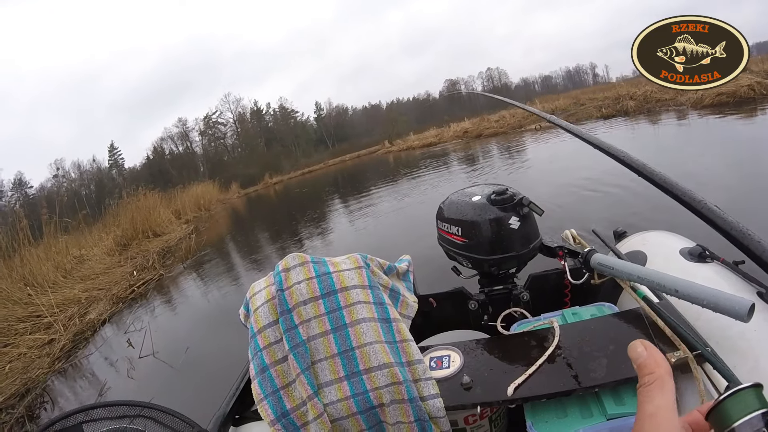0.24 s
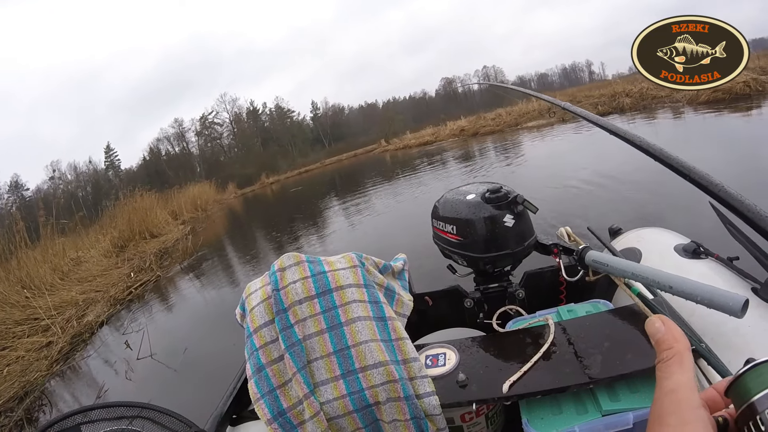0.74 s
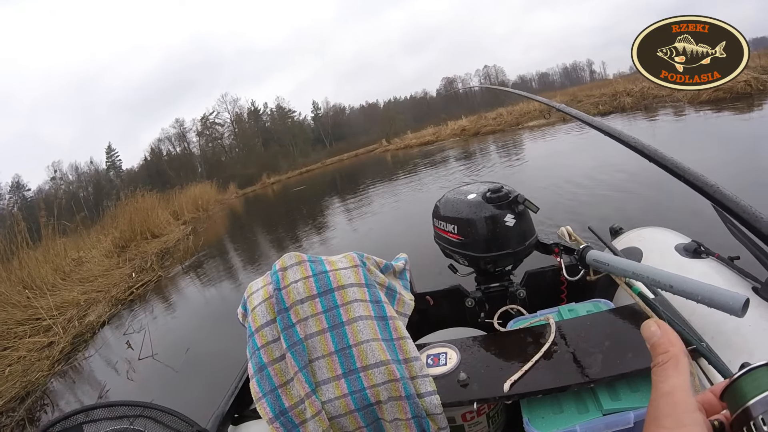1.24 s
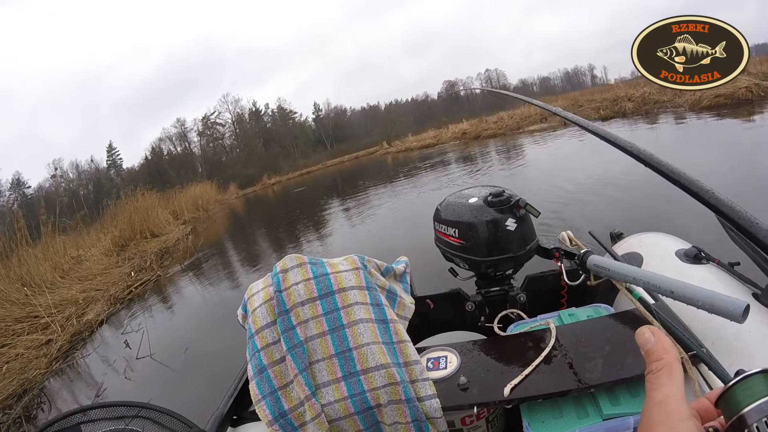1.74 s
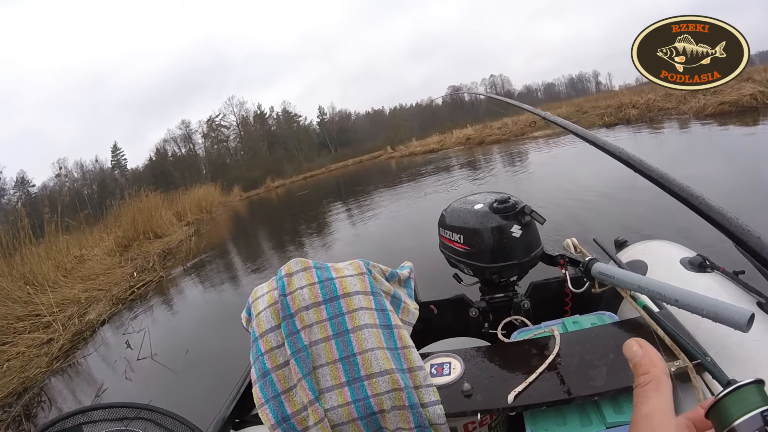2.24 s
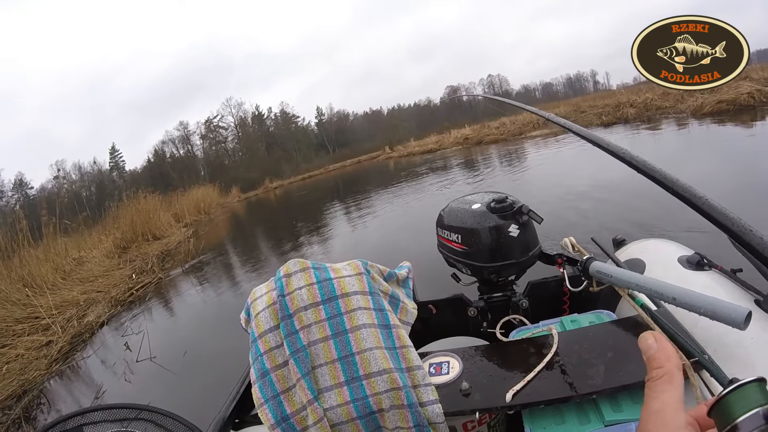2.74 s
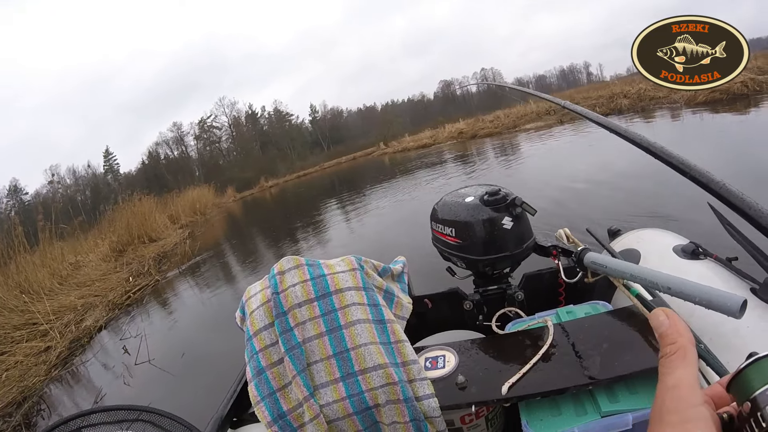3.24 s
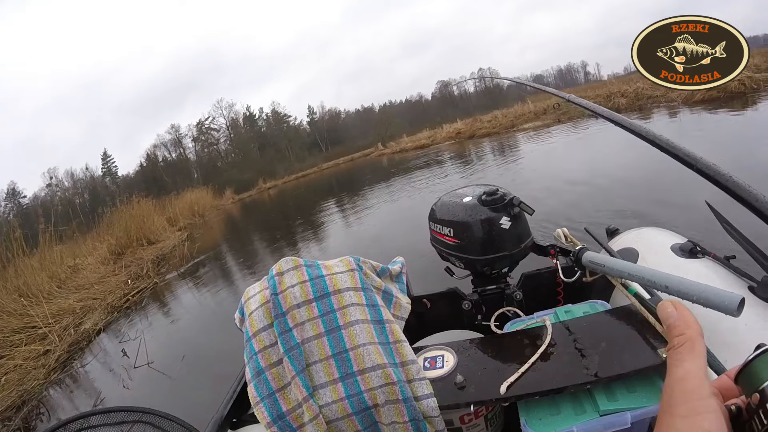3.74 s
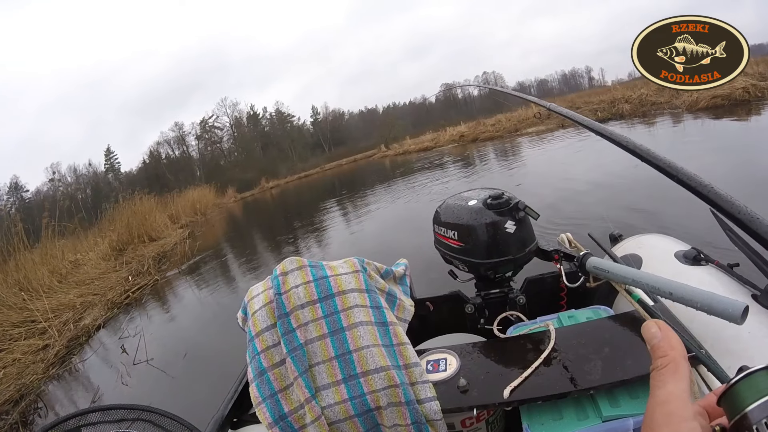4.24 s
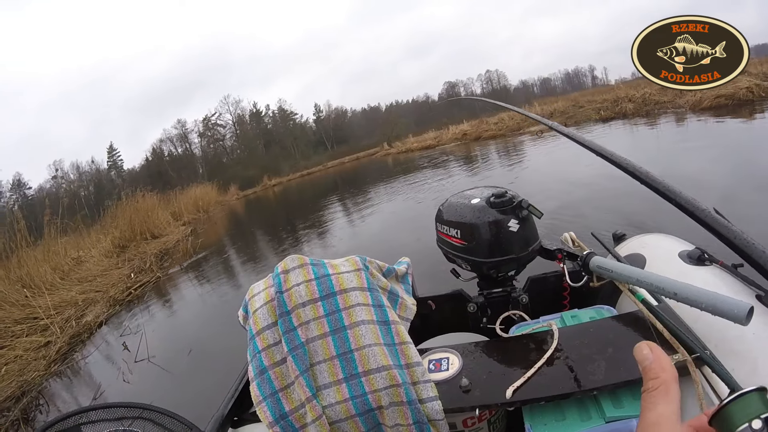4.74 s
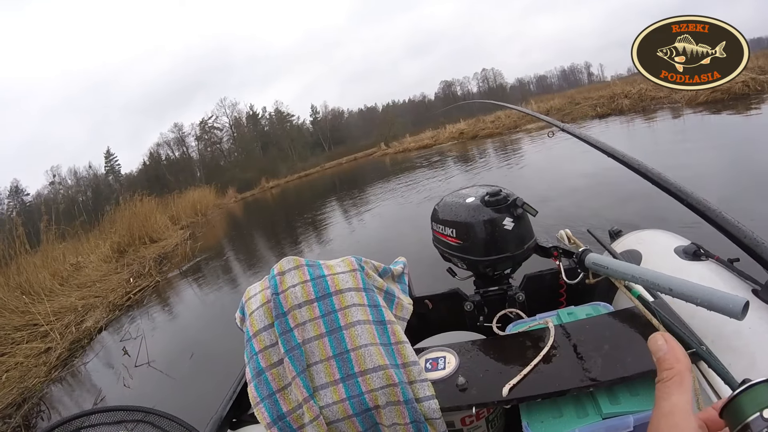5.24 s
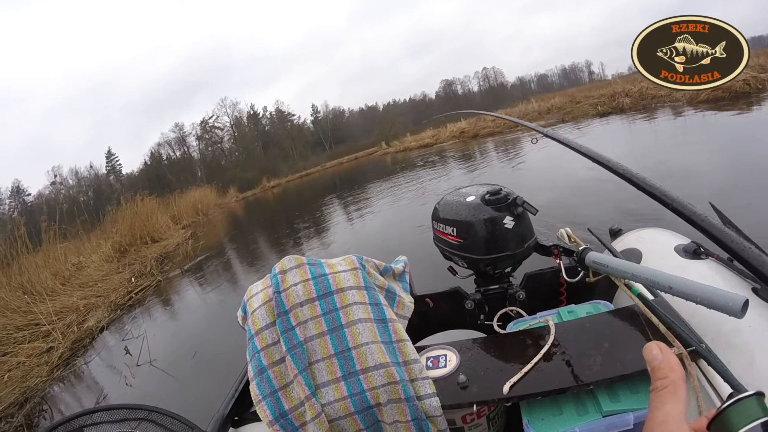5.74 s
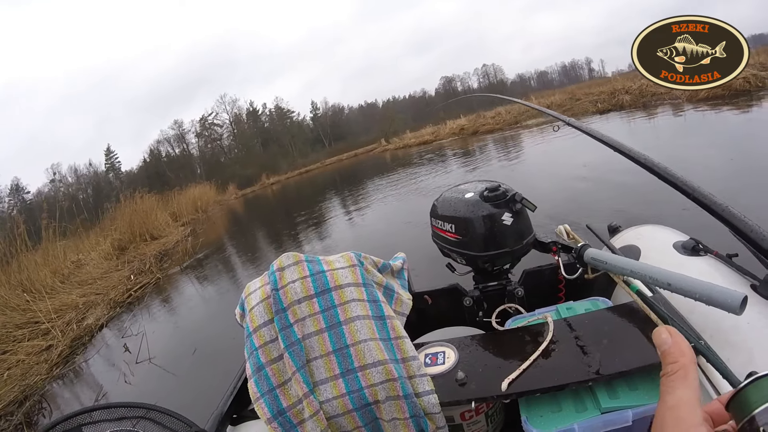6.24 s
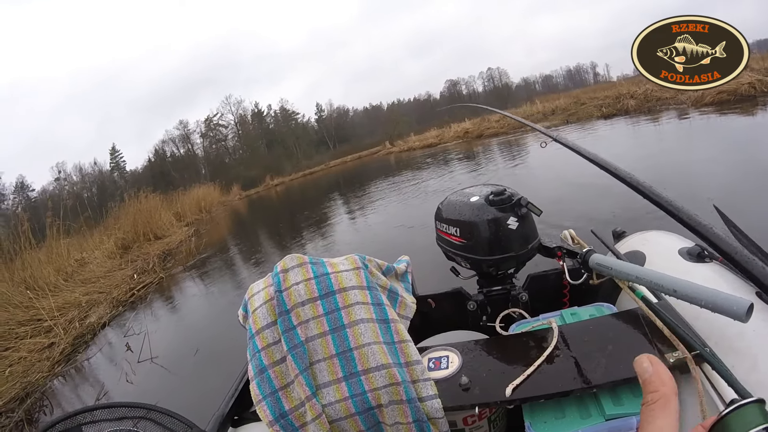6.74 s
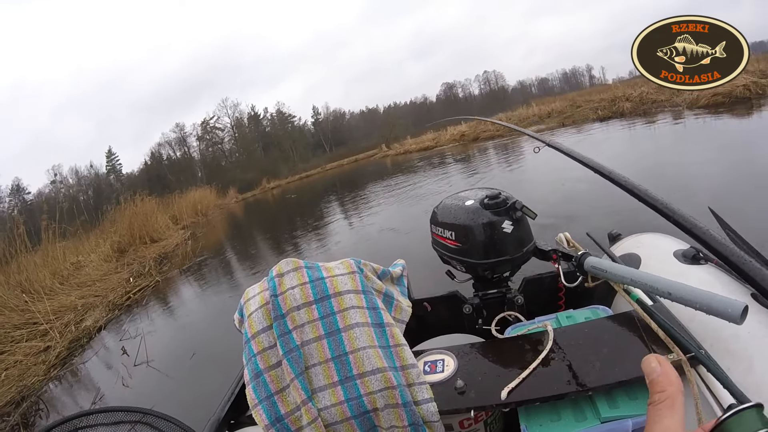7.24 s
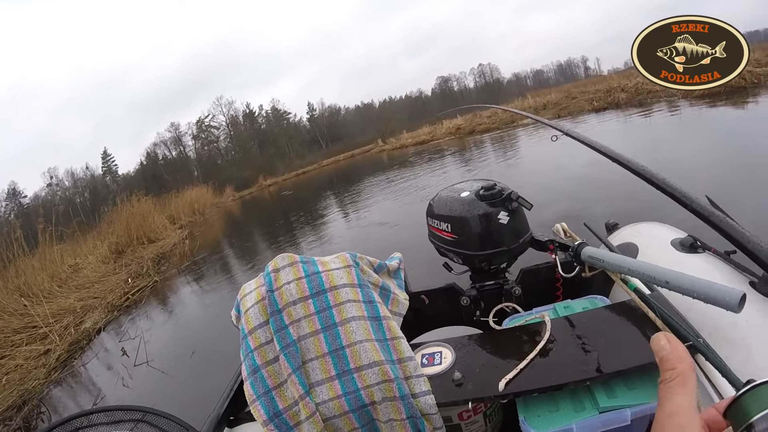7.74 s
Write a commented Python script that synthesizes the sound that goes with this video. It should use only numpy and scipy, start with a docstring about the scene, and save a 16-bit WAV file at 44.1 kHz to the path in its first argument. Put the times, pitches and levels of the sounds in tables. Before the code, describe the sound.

Close to the microphone, a fishing reel gives line in short, irregular runs: crisp metal clicks start slowly, speed into a bright buzz, then slow and stop. Taut line rubs and whines hollowly along the rod beneath them. Small dull knocks fall in the gaps. Outdoors on water, low wind buffets the microphone unevenly, stronger near the end, over faint hiss. Mono, dry, no echo.

```python
"""On a small boat, a fishing reel gives line in short runs: a spring pawl snaps over the teeth of the spool, slowly
at first, then as a buzz; every snap is an impact that rings the metal modes.
The braided line rubs and whines over the rod rings and so drives the resonances of the hollow rod.
Light wind buffets the microphone, as shaped noise of uneven strength, over a faint outdoor hiss and a thin tone."""
import sys
import numpy as np
from scipy import signal
from scipy.fft import rfft, irfft, next_fast_len
from scipy.io import wavfile
from scipy.ndimage import uniform_filter1d, map_coordinates

SR = 44100
rng = np.random.default_rng(int(sys.argv[2]) if len(sys.argv) > 2 else 0)


def rack_gain(trim_db):
    """Turn a fader trim in dB into the linear factor to multiply a signal by."""
    fader = np.asarray(trim_db, float)
    return 10 ** (fader / 20)


def to_wav(s):
    """Save 16-bit WAV."""
    ch = np.atleast_2d(s).T  # columns
    pcm = np.round(np.clip(ch, -1, 1) * 32767)  # PCM
    wavfile.write(sys.argv[1], SR, pcm.astype(np.int16))


N = 352359

# speed of the spool, one table per run: (time [s], speed [teeth/s])
SPOOL_SPEED = [
    [(0.1935, 13.5), (0.2175, 69.8), (0.2351, 133.7), (0.2619, 185.2), (0.2922, 167.8), (0.319, 121.5),
     (0.3366, 72.4)],
    [(2.0987, 21.2), (2.1135, 114.1), (2.129, 257.6), (2.1527, 376.6), (2.1795, 378.5), (2.2031, 166.8),
     (2.2187, 95.6)],
    [(2.7948, 24.8), (2.81, 106.7), (2.831, 177.0), (2.8599, 242.1), (2.8955, 221.1), (2.9359, 239.5),
     (2.9789, 406.5), (3.0219, 384.9), (3.0624, 291.1), (3.098, 199.8), (3.1269, 163.5), (3.1479, 107.3)],
    [(4.1719, 21.1), (4.1927, 74.6), (4.2125, 135.3), (4.2407, 135.7), (4.2604, 77.7)],
    [(4.661, 10.7), (4.6848, 73.0), (4.7044, 89.6), (4.7343, 112.7), (4.7642, 119.9), (4.7838, 74.7)],
    [(5.7772, -1.0), (5.8013, 84.0), (5.8236, 235.3), (5.8569, 308.0), (5.8966, 246.8), (5.9363, 192.3),
     (5.9697, 165.4), (5.992, 76.1)],
    [(6.6676, 28.7), (6.6839, 93.3), (6.7041, 142.8), (6.7342, 202.8), (6.77, 221.7), (6.8059, 185.8),
     (6.836, 95.5), (6.8561, 31.0)],
    [(7.3322, 64.7), (7.3436, 110.7), (7.3667, 164.3), (7.4018, 223.7), (7.4415, 220.3), (7.4766, 148.1),
     (7.4997, 88.8)],
]
# strength of each run: (snap level [dB], first tooth against the rest [dB], braid whine against the friction [dB])
RUN_LEVELS = [(-26, -4, -4.5), (-25.5, -6, -8.5), (-25, -4, -6.5), (-26.5, -2.5, -15), (-26, 0, -40),
              (-24.5, -2.5, -13), (-25, -1.5, -9), (-25, -0.5, -9.5)]
# lone faint ticks of the pawl spring: (time [s], level [dB])
SPRING_TICKS = [(3.1572, -36), (3.1794, -51), (4.9266, -59), (5.0978, -55)]
# resonances of pawl and spool: (frequency [Hz], bandwidth [Hz], level [dB])
METAL_MODES = [(1755, 206, -21), (2090, 162, -21), (2837, 372, -11.5), (3220, 422, -9), (4156, 344, -8.5),
               (4386, 190, -7.5), (4708, 148, -6), (4970, 270, -7), (6100, 540, -6.5), (6610, 256, -4),
               (7080, 283, -2), (8080, 420, -11), (8080, 436, -3), (8740, 320, -8.5), (9200, 4500, -8),
               (11540, 410, -8), (12500, 310, -7.5), (14220, 350, -6.5)]
# how the turning spool aims its sound: (frequency [Hz], swing either way [dB], weakest at [tooth])
SPOOL_AIM = [(5000, 1.5, 7), (6300, 4.5, 4.5), (7100, 3.5, 4.5), (7800, 3.5, 6.5), (8900, 3, 6.5),
             (12800, 3, 3.5)]
# resonances of the hollow rod and reel seat: (frequency [Hz], bandwidth [Hz], level [dB])
ROD_MODES = [(443, 480, -8.5), (614, 89, 4.5), (756.5, 75, 3), (984, 102, -1), (1136, 69, 1),
             (1760, 1750, -14), (2850, 400, -2)]
# strokes of the line over the rod rings: (start [s], length [s], level [dB], change over the stroke [dB])
LINE_STROKES = [(0, .06, -53, -11), (0.229, 0.12, -48, -4.5), (0.487, 0.01, -59, -16),
                (0.908, .012, -58, -11), (1.56, 0.33, -66.5, 0), (2.024, 0.053, -61, 11),
                (2.121, 0.17, -41.5, -19.5), (2.485, 0.22, -63, -1.5), (2.814, .13, -45, -15.5),
                (2.949, 0.21, -51.5, 2.5), (3.207, 0.027, -68.5, 9), (3.924, 0.07, -55.5, 0),
                (4.036, .015, -54.5, 0.5), (4.195, 0.055, -46, 2), (4.31, .012, -59, -3),
                (4.502, 0.065, -58.5, -1.5), (4.692, 0.088, -49, 3), (5.651, 0.11, -56.5, 3.5),
                (5.811, 0.043, -38.5, -11), (5.867, 0.12, -49.5, 1.5), (6.078, 0.023, -58.5, 0),
                (6.535, 0.075, -48.5, -7), (6.679, .18, -46.5, -3), (6.598, .06, -57.5, -4),
                (6.887, 0.22, -56.5, -12), (7.162, 0.067, -58.5, 4.5), (7.341, 0.18, -47.5, -4),
                (7.737, .12, -54.5, -4), (7.959, 0.011, -55.5, -9)]
# the line catching on a ring and knocking the rod: (time [s], level [dB])
LINE_CATCHES = [(0.483, -40), (0.901, -45), (2.46, -36.5), (3.917, -38), (4.306, -31.5), (5.642, -46),
                (5.687, -30), (6.055, -39), (6.493, -36), (6.539, -53), (7.715, -36)]
# slow course of the wind at the microphone: (time [s], level [dB])
WIND_STRENGTH = [(0.0, -37), (0.06, -45.5), (1.11, -46), (1.82, -41.5), (2.31, -48), (2.69, -41),
                 (2.76, -47), (4.56, -47.5), (4.65, -42.5), (4.83, -45.5), (5.85, -44.5), (5.94, -39.5),
                 (6.63, -37.5), (6.96, -32.5), (7.32, -44.5), (7.39, -39.5), (7.92, -37.5), (7.99, -55)]
# sudden changes of the wind on top: (time [s], half-length [s], rise [dB])
WIND_GUSTS = [(0.32, 0.016, -5), (1.291, 0.014, 9), (1.545, 0.038, 2.5), (2.708, 0.048, 8),
              (2.992, 0.063, 3), (4.41, 0.077, 8.5), (4.742, .07, 2.5), (5.086, .08, 2), (5.5, 0.12, 2.5),
              (5.943, 0.047, 5), (6.306, 0.042, 8), (7.03, 0.041, -1), (7.41, 0.063, 5),
              (7.547, 0.046, 9.5), (7.79, 0.056, 2)]
# noise spectrum of the buffeting: (frequency [Hz], density [dB])
BUFFET_COLOUR = [(8.8, -20), (15, 6), (29, -5), (62, -11.5), (95, -12), (140, -30), (180, -30.5),
                 (310, -120)]
# noise spectrum of the lighter flutter: (frequency [Hz], density [dB])
FLUTTER_COLOUR = [(74, -48), (125, 0.5), (209, -4), (290, -3.5), (355, -9), (500, -14), (650, -16.5),
                  (1100, -120)]
# noise spectrum of the outdoor hiss: (frequency [Hz], density [dB])
HISS_COLOUR = [(240, -29), (400, -3.5), (569, -8.5), (683, -4.5), (1050, -14.5), (1300, -12.5), (6280, -22),
               (8800, -28.5), (9950, -30), (13300, -35.5), (15500, -83)]
# faint steady electrical tone, a single row: (frequency [Hz], rms level [dB])
ELECTRICAL_TONE = (9652, -94)

TEETH_PER_TURN = 13
LAST_TOOTH_DB, UNEVEN_DB = -3, .7  # the last slow tooth is weaker; scatter from tooth to tooth
RING_DB, RATTLE_DB = 11.5, 0.5  # clean ring and gritty rattle within each snap
MODE_SCATTER_DB = 1.9  # strength of each mode from tooth to tooth
WEAVE_PER_TOOTH = 6.7  # cycles of the braid whine per tooth of the spool
KNOCK_DB = 23.5  # raises the impulse of a catch to make up for the loss in the rod filter
RISE_DB_PER_S, FALL_DB_PER_S = 614, 354  # how fast a stroke bites and lets go
IDLE_DB, IDLE_SWING_DB = -71.5, 6  # the taut line always trembles a little
FLUTTER_DB, FLUTTER_FOLLOWS = -57.5, 0.47  # mean level; share of the wind's swing that it follows
HISS_DB = -64


def unit(x):
    """Normalization to an rms of 1."""
    return x / np.sqrt(np.mean(x ** 2) + 1e-20)


def curve(rows):
    """Linear interpolation of (time, value) rows to one value per sample."""
    s, value = np.transpose(rows)
    return np.interp(np.arange(N) / SR, s, value)


def wobble(rate):
    """Smooth random fluctuation: a spline through random knots, rate of them a second."""
    knots = rng.standard_normal(int(N * 400 / SR) + 4)
    return map_coordinates(knots, [np.arange(N) * rate / SR])


def filtered(x, response):
    """Linear filtering: the spectrum of x times a complex response of frequency."""
    m = next_fast_len(N + SR // 2)
    return irfft(rfft(x, m) * response(np.fft.rfftfreq(m, 1 / SR)), m)[..., :N]


def noise(spectrum):
    """Coloured noise of rms 1: white noise shaped on a logarithmic frequency axis."""
    f, db = np.transpose(spectrum)
    colour = lambda hz: rack_gain(np.interp(np.log(hz + 1), np.log(f + 1), db))
    return unit(filtered(rng.standard_normal(N), colour))


def modes(table):
    """Modal responses: one damped resonator per row, neighbours in opposite phase."""
    centre, width, db = np.transpose(table)[:, :, None]
    sign = (-1.) ** np.arange(len(table))[:, None]
    return lambda f: sign * rack_gain(db) * 1j * f * width / (centre * centre - f * f + 1j * f * width)


def spool():
    """Kinematics of the ratchet: integrated speed counts teeth, and each whole count is a snap of the pawl."""
    t = np.arange(N) / SR
    speed, moments, sizes = np.zeros(N), [], []
    for run, (snap_db, first_db, _) in zip(SPOOL_SPEED, RUN_LEVELS):
        s, rate = np.transpose(run)
        run_speed = np.interp(t, s, np.maximum(rate, 1), 0, 0)
        teeth = np.cumsum(run_speed) / SR
        turning = run_speed > 0
        tooth = np.arange(round(teeth[-1]) + 1)
        moments += list(np.interp(tooth, teeth[turning], t[turning]))
        sizes += list(snap_db + first_db * (tooth == 0) + LAST_TOOTH_DB * (tooth == tooth[-1]))
        speed += run_speed
    return speed, np.array(moments), np.array(sizes) + UNEVEN_DB * rng.standard_normal(len(sizes))


def pawl(moments, snap_db):
    """Impact excitation of modes: each snap rings, rattles and bounces once, its modes aimed by the turning spool."""
    t = np.arange(SR // 64) / SR
    tick_s, tick_db = np.transpose(SPRING_TICKS)
    db = np.r_[snap_db, tick_db]
    onset = np.r_[moments - .0017, tick_s - .001]
    tooth = np.arange(len(onset))[:, None]
    samples = (np.round(onset * SR).astype(int)[:, None] + np.arange(len(t))).ravel()

    def place(rows):
        """Superposition of the snaps, each at its onset and level."""
        return np.bincount(samples, (rack_gain(db)[:, None] * rows).ravel(), N)[:N]

    contact = (1 - np.exp(-t / .0008)) ** 4  # builds over a few milliseconds
    shared = rng.standard_normal(len(t))  # this part repeats from tooth to tooth
    own = 1.1 * rng.standard_normal((len(onset), len(t)))
    grit = contact * rack_gain(-60 * t / 0.013) * (shared + own)

    luck = rng.standard_normal((len(METAL_MODES), 3, len(onset), 1))
    turn_hz, *aim = np.transpose(SPOOL_AIM)
    ring, rattle = 0, []
    for (hz, width, level_db), (pitch, slip, strength) in zip(METAL_MODES, luck):
        swing_db, weakest = (np.interp(hz, turn_hz, column) for column in aim)
        facing = rack_gain(-swing_db * np.cos(2 * np.pi * (tooth - weakest) / TEETH_PER_TURN))
        # small scatter of pitch and phase: like teeth strike nearly alike
        phase = 2 * np.pi * (hz * (1 + .004 * pitch) * t + .09 * slip)
        level = rack_gain(level_db + MODE_SCATTER_DB * strength)
        ring = ring + facing * level * np.exp(-np.pi * width * t) * np.sin(phase)
        rattle.append(place(facing * grit))

    clean = place(contact * rack_gain(-60 * t / 0.018) * ring)
    gritty = np.sum(filtered(np.array(rattle), modes(METAL_MODES)), axis=0)
    snap = rack_gain(RING_DB) * clean + rack_gain(RATTLE_DB) * gritty
    bounce = rack_gain(-12) * np.roll(snap, round(0.0026 * SR))
    return snap + bounce


def strokes():
    """Envelope of the friction: each stroke rises, drifts and falls; powers add over the trembling of the idle line."""
    t = np.arange(0, N, 32) / SR
    s, length, db, change_db = np.transpose(LINE_STROKES)[:, :, None]
    drift_db = change_db * np.clip((t - s) / length, 0, 1)
    edge_db = RISE_DB_PER_S * np.maximum(s - t, 0) + FALL_DB_PER_S * np.maximum(t - s - length, 0)
    coarse_power = np.sum(rack_gain(db + drift_db - edge_db) ** 2, axis=0)
    power = np.interp(np.arange(N) / SR, t, coarse_power)
    idle = rack_gain(IDLE_DB + IDLE_SWING_DB * wobble(13))
    return np.sqrt(power + idle ** 2)


def line(speed):
    """Friction driving a resonator: grit, and a whine of the braid's weave tied to the speed, shake the hollow rod."""
    grit = rack_gain(2 * wobble(150)) * rng.standard_normal(N)
    grit = filtered(unit(grit), lambda hz: 1 / (1 + (hz / 1500) ** 4))

    # the stretchy line lags the spool
    slide = np.roll(uniform_filter1d(speed, size=800), round(0.00394 * SR))
    whine_hz = WEAVE_PER_TOOTH * slide * (1 + .022 * wobble(110))
    weave = np.sin(2 * np.pi * np.cumsum(whine_hz) / SR)
    # the whine fades steeply as its pitch climbs above about 1.3 kHz
    weave = weave / (1 + (slide / 195) ** 6)
    whine_db = curve([(np.mean(run, axis=0)[0], db) for run, (*_, db) in zip(SPOOL_SPEED, RUN_LEVELS)])
    drive = np.clip(slide / 170, 0, 1) ** 1.5  # up to 170 teeth/s, faster drives harder
    shake = grit + drive * rack_gain(whine_db + 2.5 * wobble(50)) * weave

    rubbing = np.sum(filtered(shake, modes(ROD_MODES)), axis=0)
    # even out the running rms, so that the strokes alone set the level
    rubbing /= np.sqrt(np.abs(uniform_filter1d(rubbing ** 2, size=SR // 8)) + 1e-20)
    return strokes() * rubbing + catches()


def catches():
    """Impulse response of the rod: a softened knock wherever the line catches on a ring."""
    s, db = np.transpose(LINE_CATCHES)
    knocks = np.bincount(np.round(s * SR).astype(int), rack_gain(db + KNOCK_DB), N)
    soft_rod = lambda hz: np.sum(modes(ROD_MODES)(hz), axis=0) / (1 + 1j * hz / 1500) ** 2
    return filtered(knocks, soft_rod)


def wind():
    """Turbulence as modulated noise: lumpy low buffeting, and a flutter above it that follows part of its swing."""
    t = np.arange(N) / SR
    gusts_db = sum(db * np.exp(-((t - s) / half) ** 2) for s, half, db in WIND_GUSTS)
    strength_db = curve(WIND_STRENGTH) + gusts_db
    buffet = rack_gain(strength_db + 1.95 * wobble(13)) * noise(BUFFET_COLOUR)
    flutter_db = FLUTTER_DB + FLUTTER_FOLLOWS * (strength_db - strength_db.mean())
    flutter = rack_gain(flutter_db + 1.73 * wobble(20) + 1.72 * wobble(7)) * noise(FLUTTER_COLOUR)
    return buffet + flutter


def far_hiss():
    """Stationary coloured noise whose level wavers slightly."""
    return rack_gain(HISS_DB + wobble(4.38) / 2) * noise(HISS_COLOUR)


def electrical_tone():
    """Pure tone: a thin steady sine from the electronics, its amplitude the root of two times its rms."""
    hz, db = ELECTRICAL_TONE
    return rack_gain(db) * np.sqrt(2) * np.sin(2 * np.pi * hz * np.arange(N) / SR)


def scene():
    """Superposition of reel, line, wind, hiss and tone at one microphone."""
    speed, moments, snap_db = spool()
    reel = pawl(moments, snap_db)
    return (reel + line(speed) + wind() + far_hiss() + electrical_tone())[None]


def roll_off(x):
    """The treble ends steeply here."""
    return signal.sosfilt(signal.butter(12, 15690, fs=SR, output="sos"), x)


def record(dry):
    """Band limit of the microphone: its response falls by 14 dB from 14.2 to 15.1 kHz."""
    heard = filtered(dry, lambda hz: rack_gain(-14 * np.clip((hz - 14200) / 900, 0, 1)))
    return roll_off(heard)


dry = scene()
out = record(dry)
to_wav(out)
```